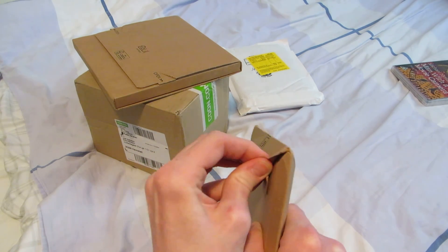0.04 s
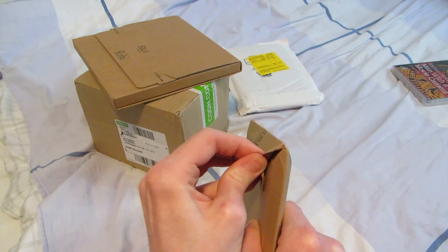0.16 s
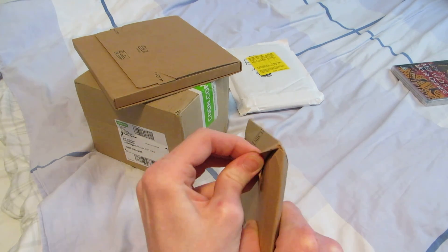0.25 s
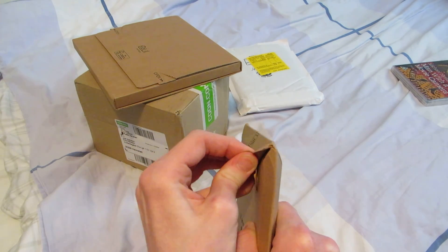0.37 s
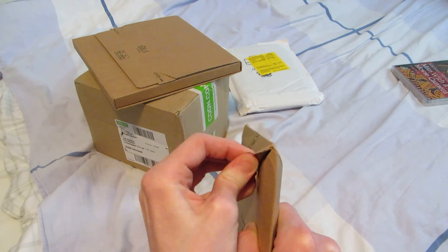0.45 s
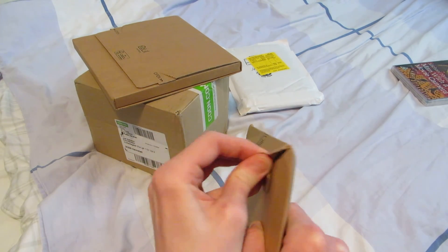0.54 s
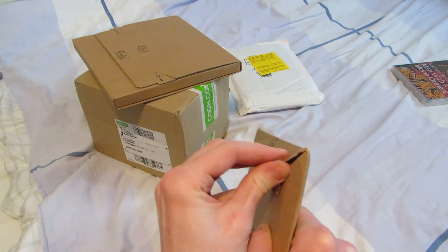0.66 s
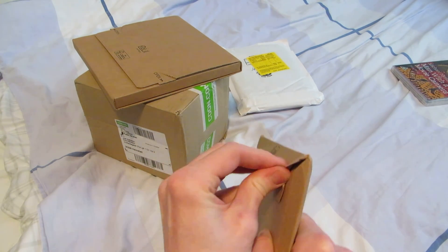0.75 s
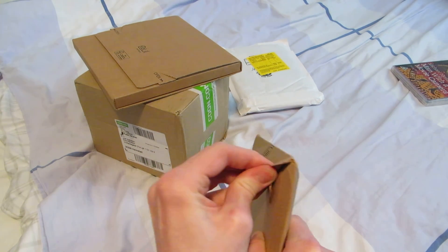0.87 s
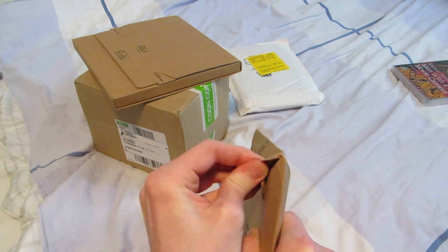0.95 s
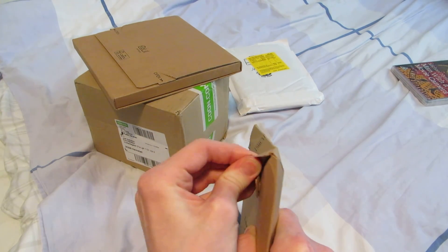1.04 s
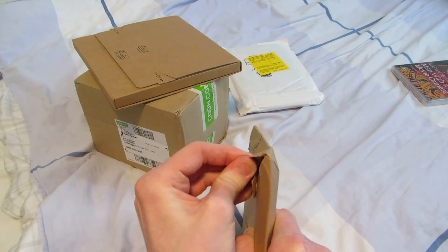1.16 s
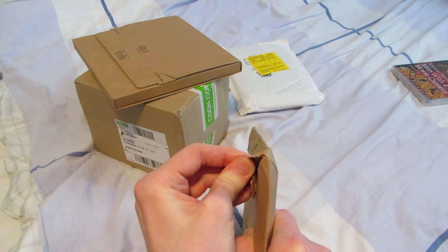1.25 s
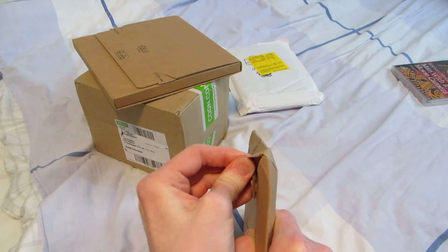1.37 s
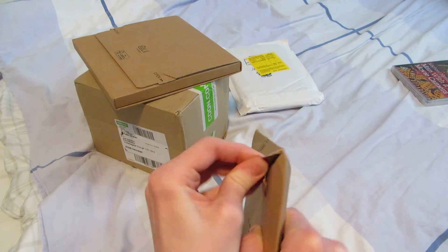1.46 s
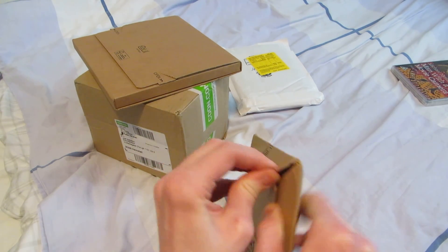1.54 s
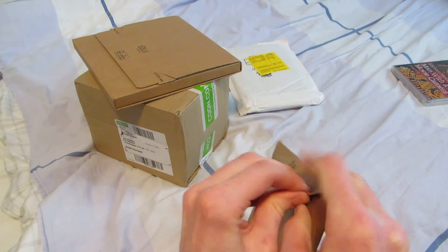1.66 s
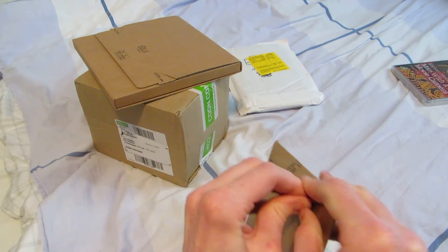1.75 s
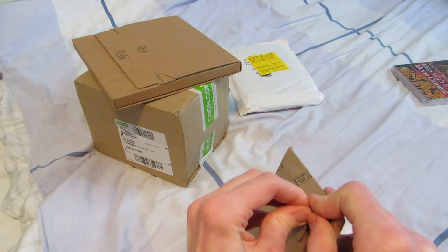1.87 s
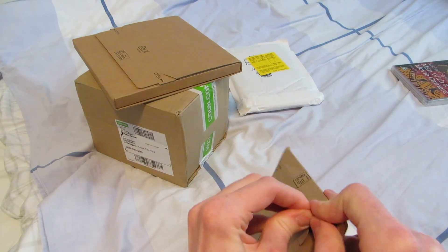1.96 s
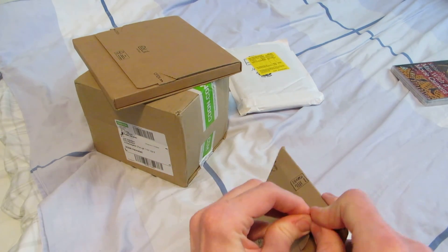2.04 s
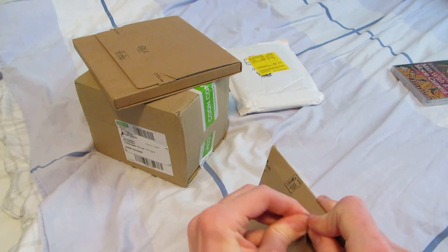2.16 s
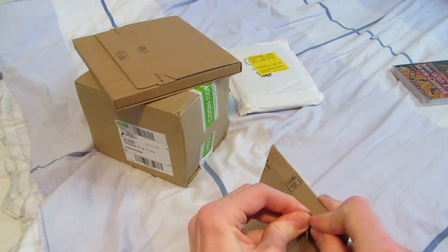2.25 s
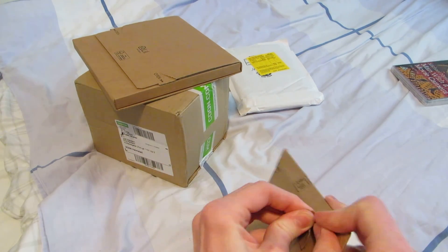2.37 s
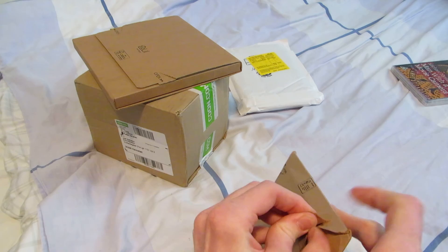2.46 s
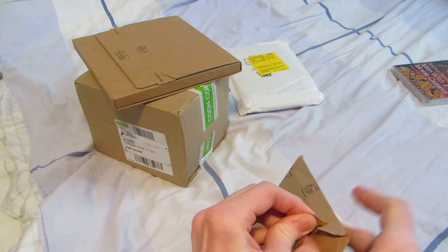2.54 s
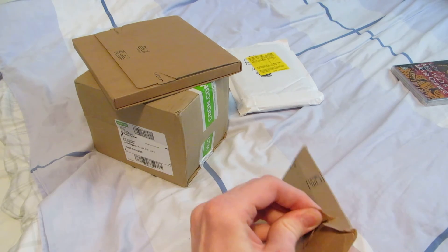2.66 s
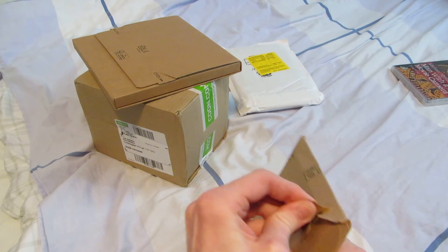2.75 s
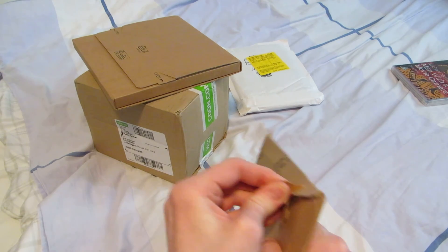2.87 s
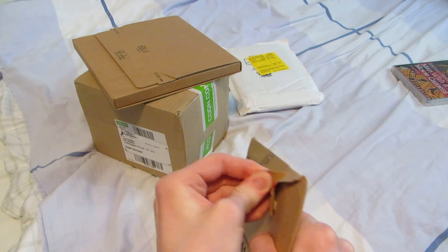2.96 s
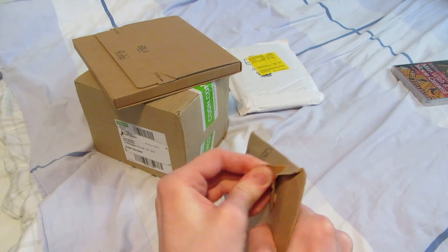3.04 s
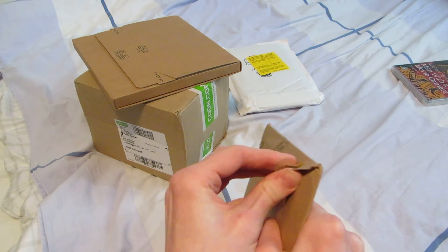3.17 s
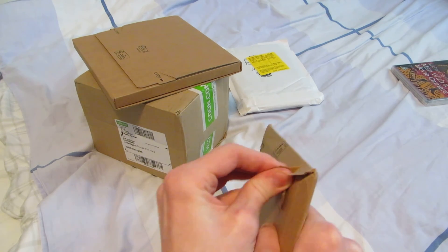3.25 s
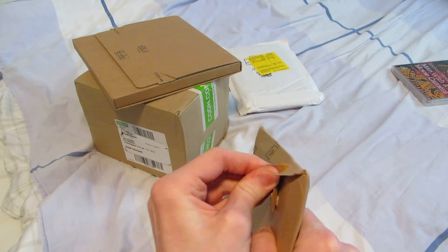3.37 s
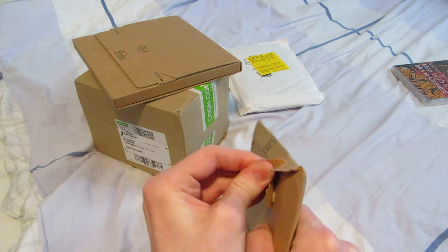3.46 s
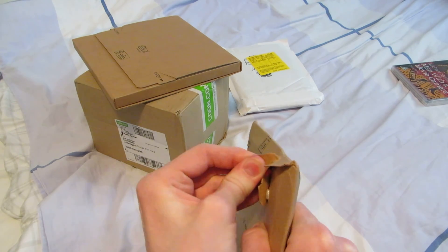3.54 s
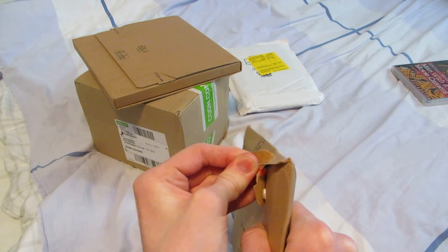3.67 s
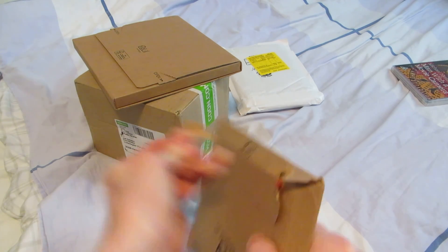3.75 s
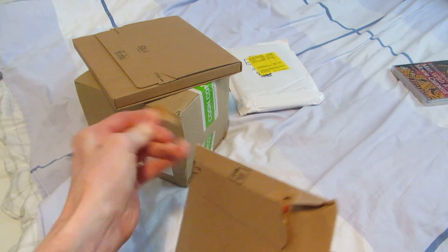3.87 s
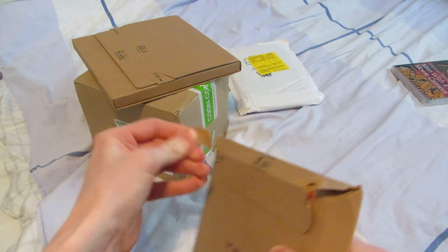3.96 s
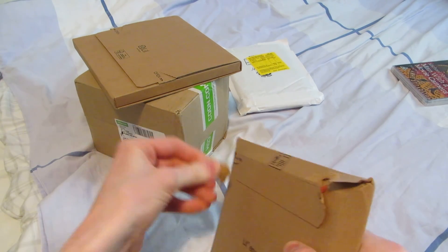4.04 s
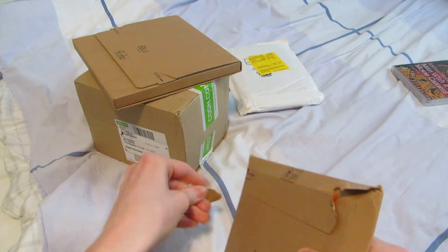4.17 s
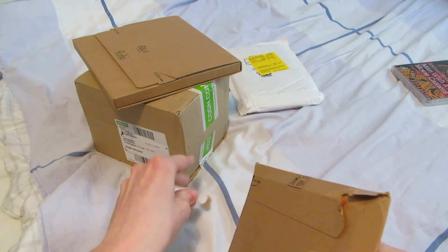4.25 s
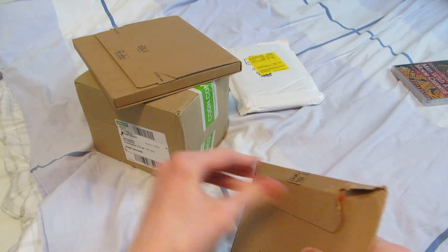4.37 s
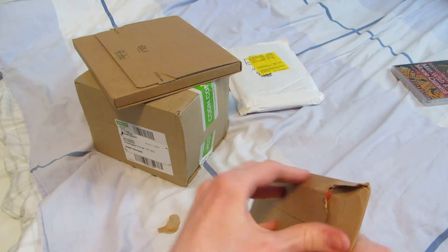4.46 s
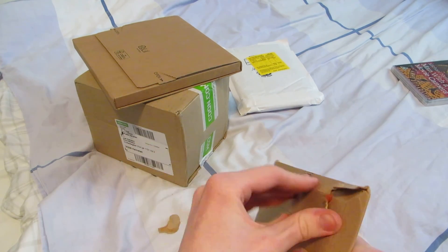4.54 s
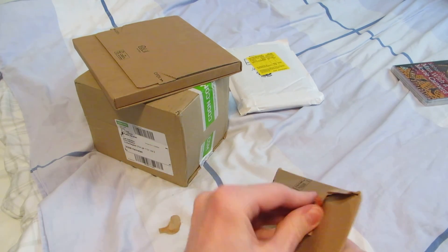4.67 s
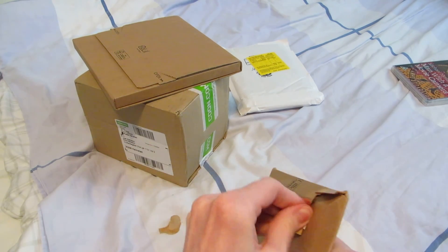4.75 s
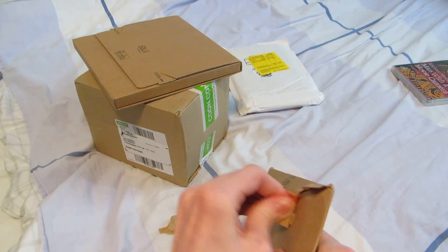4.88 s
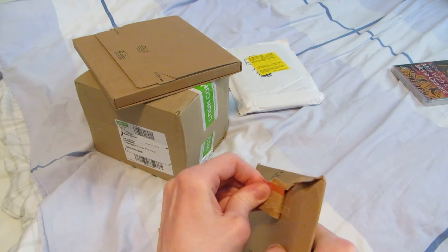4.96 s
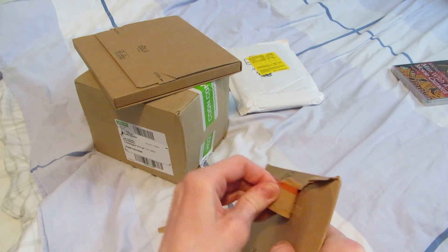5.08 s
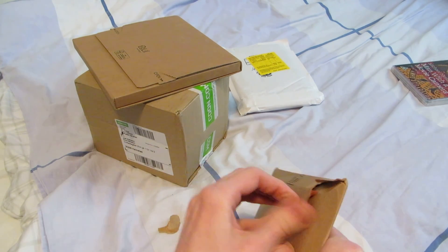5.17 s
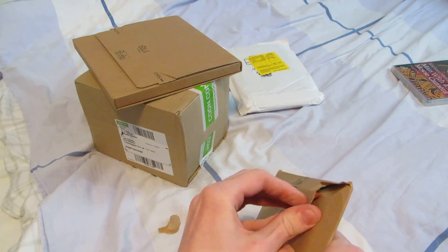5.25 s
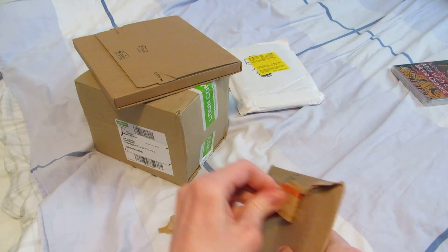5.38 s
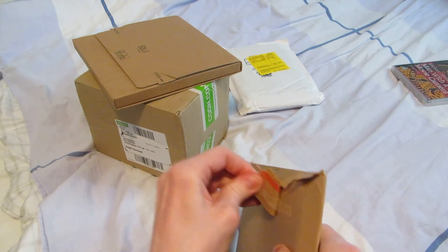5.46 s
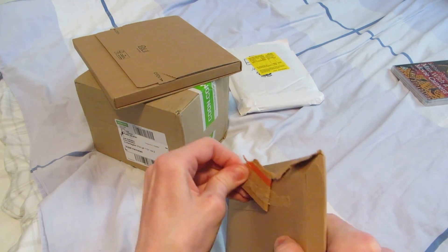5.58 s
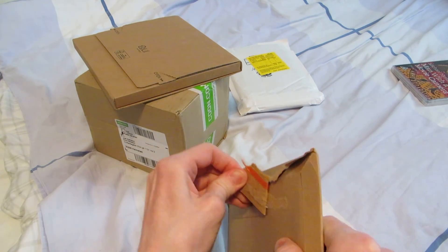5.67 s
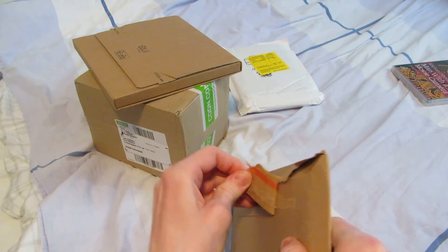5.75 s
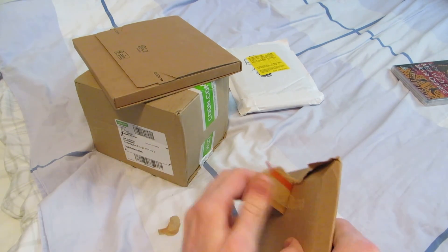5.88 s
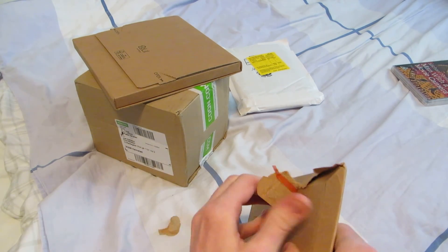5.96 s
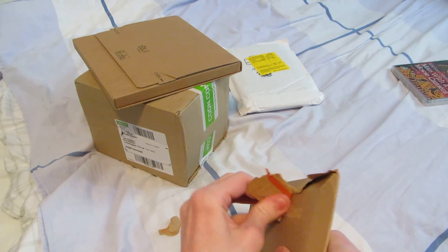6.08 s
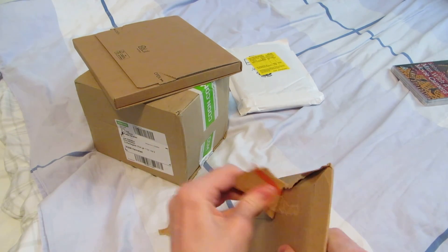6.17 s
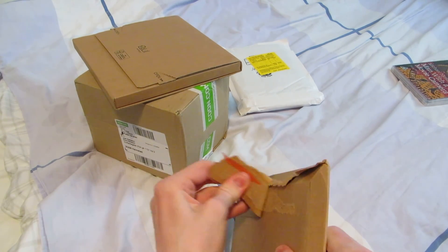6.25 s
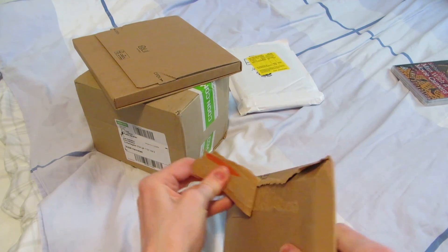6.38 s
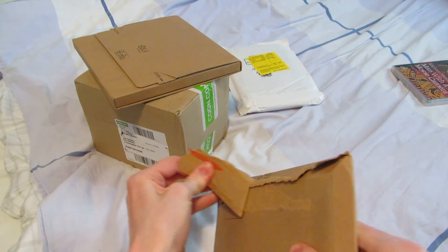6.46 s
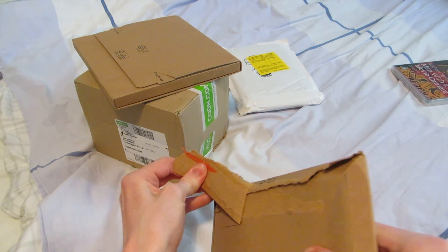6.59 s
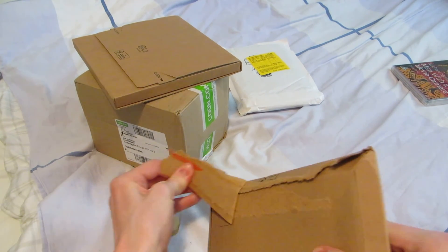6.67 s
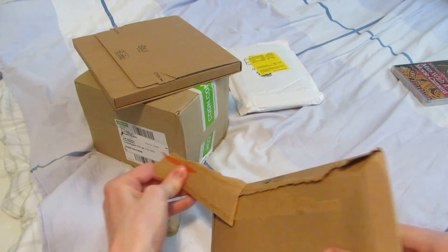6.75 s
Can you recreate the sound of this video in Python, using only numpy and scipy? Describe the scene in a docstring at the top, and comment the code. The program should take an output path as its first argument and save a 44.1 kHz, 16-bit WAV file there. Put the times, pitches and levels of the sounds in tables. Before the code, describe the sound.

In a small, soft-furnished bedroom, a fingernail picks at a cardboard mailer with sparse crisp ticks. Fingers slide and rustle, the nail rasps along a fold, and a corner tears off with a short, loud jerk. After softer handling come sharp card snaps and brief rips, then longer, grainy tearing runs to the end. Close stereo camera microphone, slight hiss, very little reverberation.

```python
"""A nail picks at the flap of a cardboard mailer, close by in a small bedroom, over soft camera hiss.
Fingers slide over the card, the nail drags along the fold and a corner tears off with a jerk.
Then the card buckles with a few sharp snaps, and the tear strip is pulled in long, grainy rips.
Strokes are many tiny random clicks coloured by the hollow card; ticks and snaps are single cracks
with a short ring of the panel. Room reflections and gain control are added on top."""
import sys
import numpy as np
from scipy import signal
from scipy.fft import rfft, irfft
from scipy.io import wavfile
from scipy.ndimage import uniform_filter1d

SR = 44100
rng = np.random.default_rng(int(sys.argv[2]) if len(sys.argv) > 2 else 0)


def unload_wav(signal):
    """Save mono or channel-first audio to the path in sys.argv[1] as 16-bit WAV at rate SR, clipped to [-1, 1]."""
    wavfile.write(
        sys.argv[1],
        SR,
        np.round(np.clip(np.atleast_2d(signal).T, -1, 1) * 32767).astype(np.int16),
    )


N = 300665
HZ = np.fft.rfftfreq(4096, 1 / SR)  # frequency grid for the filters


def amp(db):
    """Turns decibels into a gain."""
    return 10 ** (np.asarray(db) / 20)


def evened(x):
    """Scales a signal to an average strength (rms) of 1."""
    return x / np.sqrt(np.mean(x ** 2) + 1e-20)


def read(points, hz):
    """Reads values between the rows of a table, along a logarithmic pitch scale."""
    f, value = np.transpose(points)
    return np.interp(np.log(hz + 1), np.log(f + 1), value)


def add(mix, s, sound):
    """Mixes a sound in at time s, in seconds."""
    start = max(round(s * SR), 0)
    part = mix[..., start:][..., :sound.shape[-1]]
    part += sound[..., :part.shape[-1]]


def ring(db):
    """The click response of a filter with gain db on the grid HZ; it starts at once (minimum phase)."""
    log_gain = np.log(amp(np.maximum(db - db.max(), -100)))
    circle = np.concatenate([log_gain, log_gain[-2:0:-1]])
    response = np.exp(np.conj(signal.hilbert(circle)))
    return irfft(response[:len(HZ)])


def coloured(x, db):
    """Filters a signal to the tone colour db."""
    return signal.fftconvolve(x, ring(db))[:len(x)]


def hump(hz, centre_hz, steep_db):
    """A broad hump in dB that has fallen by steep_db one octave from its centre."""
    octaves = np.log2((hz + 1) / centre_hz)
    return -steep_db * (np.sqrt(1 + 3 * octaves ** 2) - 1)


def resonate(x, hz, width):
    """A resonance of gain 1 whose pitch follows the curve hz."""
    turn = np.exp(2j * np.pi * np.cumsum(hz) / SR)
    r = np.exp(-np.pi * width / SR)
    # shift the moving pitch down to zero, smooth there, and shift back up
    return 2 * (turn * signal.lfilter([1 - r], [1, -r], x / turn)).real


# How wide the sound is at the two microphones: (f/Hz, side-minus-middle level/dB)
STEREO_WIDTH = [(150, -11.5), (500, -11.5), (1500, -15.5), (3000, -15.5), (6000, -11), (10000, -6),
                (15000, -4)]


def spread(mid, side):
    """Left and right: nearly alike in the middle of the range, wider in the treble."""
    size = len(side)
    width = amp(read(STEREO_WIDTH, np.fft.rfftfreq(size, 1 / SR)))
    side = irfft(rfft(side) * width, size)
    return np.array([mid + side, mid - side])


# How far a stroke's level moves in one rise or fall time [dB]
SWELL_DB = 21.5


def pressure(strokes, sag_octaves_per_s):
    """Strokes swell, hold and die away, adding in power; the ring of the card patch sags meanwhile."""
    t = np.arange(0, N, 32) / SR
    s, rise, hold, fall, db, flex, fizz, hz, lift = np.transpose(strokes)[..., None]
    away = np.maximum(s - t, 0) / rise + np.maximum(t - s - hold, 0) / fall
    power = amp(db - SWELL_DB * away) ** 2 + 1e-20
    # one gain each for flexing panel, main band and fizz
    gains = [np.sqrt((power * amp(band) ** 2).sum(0)) for band in (flex, 0, fizz)]
    sagged = hz * 2 ** (-sag_octaves_per_s * np.clip(t - s, -rise, hold + fall))
    # the stronger stroke has more say in the patch's pitch and lift
    patch = [(curve * power).sum(0) / power.sum(0) for curve in (sagged, lift)]
    return [np.interp(np.arange(N) / SR, t, curve) for curve in (*gains, *patch)]


# Resonances of the hollow mailer: (f/Hz, width f/Hz, lift level/dB, scaled by each kind of stroke)
HOLLOW_RESONANCES = [(259, 51, 1.5), (880, 57, -2.5), (998, 48, 4), (1494, 120, 8), (2272, 69, 6.5),
                     (2520, 53, -1), (2974, 116, 6.5), (3560, 150, 5.5), (4420, 360, 3), (7500, 460, 1.5)]


def friction(strokes, colour, split_hz, per_s, spread_db, clump_db, clump_s, hollow, bed_db,
             patch_width_hz=800, wander_octaves=0.069, sag_octaves_per_s=.4):
    """Fibres catch and break in clumps; each break is a click that sounds through the mailer."""
    chance, size = rng.random(N), rng.exponential(1, N)
    sign, bearing, clumps, fine = rng.standard_normal((4, N))
    fade = np.exp(-np.arange(SR // 10) / (clump_s * SR))
    clumps = evened(signal.fftconvolve(clumps, fade)[:N])

    clicks = (chance < per_s / SR) * np.sign(sign) * amp(spread_db * np.minimum(size, 4))
    # a bed of fine noise fills the gaps between clicks
    breaks = evened(clicks) + amp(bed_db) * fine
    breaks = breaks * amp(clump_db * np.clip(clumps, -2, 2))
    # each break lies in a slightly different direction
    breaks = np.array([breaks, breaks * bearing])

    *gains, patch_hz, patch_db = pressure(strokes, sag_octaves_per_s)
    # the patch changes size a little from one clump to the next
    wander = uniform_filter1d(rng.standard_normal(N), size=700)
    wander = evened(uniform_filter1d(wander, size=400))
    patch_hz = patch_hz * 2 ** (wander_octaves * np.clip(wander, -2, 2))
    breaks = breaks + (amp(patch_db) - 1) * resonate(breaks, patch_hz, patch_width_hz)

    lift_db = sum(db / (1 + (2 * (HZ - hz) / width) ** 2) for hz, width, db in HOLLOW_RESONANCES)
    tone_db = read(colour, HZ) + hollow * lift_db
    pair = spread(*(coloured(part, tone_db) for part in breaks))

    # split into flexing panel, main band and fizz, even each one out, then apply its gain
    filters = [signal.butter(4, hz, fs=SR, output="sos") for hz in split_hz]
    low, upto = (signal.sosfiltfilt(sos, pair, padtype="even") for sos in filters)
    bands = (low, upto - low, pair - upto)
    return sum(gain * part / part.mean(0).std() for gain, part in zip(gains, bands))


def crack(centre_hz, steep_db):
    """One dry click of peak 1, with its energy heaped around centre_hz."""
    click = ring(hump(HZ, centre_hz, steep_db))
    return click / abs(click).max()


def splinter(click, after_db, after_s):
    """Neighbouring fibres give way just after the first, a little differently for each microphone."""
    t = np.arange(SR // 100) / SR
    shared, left, right = rng.standard_normal((3, len(t))) * np.exp(-t / after_s)
    train = shared + .5 * np.array([left, right])
    train *= amp(after_db) / np.linalg.norm(train[0])
    train[:, 0] = 1  # the first break itself
    return signal.fftconvolve(click[None], train, axes=1)


# Ways the panel rings: (f/Hz, level/dB before scaling to peak 1, time to fall 60 dB t/s)
PANEL_MODES = [(185, -13, 0.044), (264, 1.5, 0.038), (361, 2.5, 0.023), (443, -1.5, 0.019),
               (740, -7.5, 0.011), (892, -5, 0.027), (1030, 1.5, 0.013), (1152, 0.5, 0.013),
               (1472, 1.5, 0.026), (2300, -12, 0.0157)]


def knock(centre_hz, steep_db=11, cut_share=.58):
    """The panel rings briefly; the larger the patch that moves, the lower the modes it drives."""
    t = np.arange(SR // 8) / SR
    modes = np.zeros(len(t))
    for hz, db, t60 in PANEL_MODES:
        decay = np.exp(-np.log(1000) * t / t60)
        modes += amp(db + hump(hz, centre_hz, steep_db)) * decay * np.sin(2 * np.pi * hz * t)
    # a patch radiates almost nothing far below its own pitch
    high_pass = signal.butter(3, cut_share * centre_hz, "high", fs=SR, output="sos")
    modes = signal.sosfilt(high_pass, modes)
    return modes / abs(modes).max()


# Faint throb and hum, opposite in the two channels: (f/Hz, left rms level/dB, right rms level/dB)
THROB_AND_HUM = [(18.3, -55.5, -90), (123, -66, -72.5)]
# Colour of the hiss both channels share: (f/Hz, relative level/dB)
HISS_SHARED = [(35, -38), (60, -3), (193, -10.5), (732, -5), (1250, -1), (1440, -5.5), (1620, -5),
               (3120, -10), (3420, -10), (7060, -17), (7750, -16), (8320, -17), (16000, -25)]
# Colour of the hiss that is opposite in the two channels: (f/Hz, relative level/dB)
HISS_OPPOSITE = [(35, -32), (60, 4), (160, -10), (256, -3), (636, -5), (715, 3), (767, -7), (968, -1.5),
                 (1280, -6), (1410, -4.5), (3580, -12), (4030, -13.5), (5460, -16), (11800, -26),
                 (16000, -36)]
# Reference level of the hiss, before the shared and opposite trims [dB]
HISS_LEVEL_DB = -51.5


def camera_noise(shared_db=-2.5, apart_db=5):
    """Steady hiss is filtered noise, mostly opposite left and right; throb and hum are plain sines."""
    mid = amp(shared_db) * evened(coloured(rng.standard_normal(N), read(HISS_SHARED, HZ)))
    side = amp(apart_db) * evened(coloured(rng.standard_normal(N), read(HISS_OPPOSITE, HZ)))
    noise = amp(HISS_LEVEL_DB) * np.array([mid + side, mid - side])
    for hz, left, right in THROB_AND_HUM:
        tone = np.sqrt(2) * np.sin(2 * np.pi * hz * np.arange(N) / SR)
        noise += np.outer([amp(left), -amp(right)], tone)
    return noise


# A nail picks at the edge of the flap. All stroke tables have these columns:
# (full pressure from t/s, rise t/s, hold t/s, fall t/s, level/dB before the function's trim,
#  panel flexing level/dB re stroke, fibre fizz level/dB re stroke,
#  ring of the card patch at the contact f/Hz, lift of that ring level/dB)
PICK_STROKES = [(0.035, 0.15, 0.0072, 0.055, -40, -15, -1, 6000, 2),
                (0.063, 0.012, 0.0081, 0.15, -39.5, -11, -1, 6000, .5),
                (0.19, 0.0089, 0.028, 0.084, -37.5, -6, -1, 4800, -7),
                (0.28, 0.045, .15, 0.062, -47, -7.5, -2, 3800, 3.5),
                (0.885, 0.062, 0.079, 0.53, -47.5, -8, -4.5, 3970, -3.5)]
# Tone colour of picking: (f/Hz, relative level/dB)
PICK_TONE = [(88, -62), (150, -24), (376, -22), (545, -37), (589, -27), (821, -4), (888, -20), (960, -3),
             (1660, -9.5), (3490, 0), (5250, -5.5), (8400, -1), (16000, -16)]
FINGER_SPLIT_HZ = (2200, 7000)  # where flexing, main band and fizz part


def picking():
    """The nail catches few fibres at a time, so the clicks come as sparse crackle."""
    return amp(-3.0) * friction(
        PICK_STROKES, PICK_TONE, FINGER_SPLIT_HZ, per_s=600, spread_db=2.0,
        clump_db=5.0, clump_s=0.0029, hollow=0.37, bed_db=-4.5)


# The clearer ticks of nail and fibre:
# (t/s, first crack level/dB, centre f/Hz, knock on the panel level/dB re crack)
TICK_EVENTS = [(0.0269, -23, 5970, -23), (0.0367, -25, 6500, -22), (0.037, -15, 6460, -29),
               (0.064, -17.5, 5960, -20.5), (.1165, -22.5, 6000, -24), (.123, -22.5, 6000, -30),
               (0.1886, -12.5, 4850, -29), (0.199, -19, 5500, -32), (0.2066, -10.5, 5700, -22),
               (.2278, -21, 5500, -31), (0.2414, -25, 5500, -29), (0.2831, -19, 5600, -28),
               (0.3527, -21.5, 5900, -23), (.426, -25, 6550, -29), (.6595, -27, 1800, -3),
               (0.9554, -22, 5470, -27.5), (0.986, -27, 6960, -28), (1.353, -35.5, 2180, -0.5),
               (1.549, -18, 6740, -16), (2.891, -18, 5940, -26), (3.1847, -20.5, 2200, -1.5),
               (3.306, -26, 3470, -21), (3.3757, -23, 6000, -33), (3.3915, -22.5, 6000, -24),
               (3.5732, -9.5, 4170, -24), (3.6752, -10.5, 4500, -20), (3.721, -12.5, 4500, -30),
               (4.487, -19.5, 3020, -8.5), (4.6384, -13.5, 5630, -28), (4.7326, -14, 4260, -15.5),
               (4.7537, -25.5, 2560, -2.5), (4.8817, -21.5, 2170, -5.5), (5.1834, -19, 4500, -22.5),
               (5.4278, -20.5, 4430, -11), (5.749, -20.5, 5270, -18), (6.0546, -20.5, 3000, -7.5),
               (6.179, -13, 4860, -25), (6.2095, -5, 4470, -34), (6.2405, -4, 3500, -8),
               (6.311, -12, 5000, -11), (6.3713, -7.5, 3600, -13), (6.4874, -3, 4000, -16),
               (6.677, -7, 3500, -26)]


def ticks():
    """Each tick is a small crack with splinters and a knock on the panel."""
    out = np.zeros((2, N))
    for s, db, hz, knock_db in TICK_EVENTS:
        add(out, s, amp(db) * splinter(crack(hz, steep_db=10.5), after_db=-5.5, after_s=0.0014))
        add(out, s, amp(db + knock_db) * knock(880, steep_db=2))
    return out


# How fast the bedroom's tail dies: (f/Hz, time to fall 60 dB t/s)
ROOM_DECAY = [(150, 0.08), (500, 0.1053), (1500, 0.1164), (4000, 0.2355), (8000, 0.21), (16000, 0.1)]
# First reflections: (delay t/s, level/dB)
FIRST_ECHOES = [(.005, -16.5), (.0091, -27), (0.0157, -35), (0.018, -22.5)]


def bedroom(x, wet_db=-12):
    """A few near reflections, and a short noise-like tail that the bedding soaks up."""
    noise = spread(*rng.standard_normal((2, SR // 2)))
    hz, t, z = signal.stft(noise, SR, nperseg=256)
    decay = np.exp(-np.log(1000) * t / read(ROOM_DECAY, hz)[:, None])
    z = z * decay * np.minimum(t / 0.009, 1)  # the tail builds up over 9 ms
    tail = signal.istft(z, SR, nperseg=256)[1]
    tail *= amp(wet_db) / np.linalg.norm(tail[0])
    for s, db in FIRST_ECHOES:
        add(tail, s, amp([db]))
    return signal.fftconvolve(x.mean(0)[None], tail, axes=1)[:, :N]


# Skin and loose card slide over the mailer: stroke columns as in PICK_STROKES
# (t/s, rise t/s, hold t/s, fall t/s, level/dB, flex level/dB, fizz level/dB, ring f/Hz, lift level/dB)
RUB_STROKES = [(0.605, 0.057, 0.026, 0.047, -47, -5, -4.5, 1980, 4.8),
               (0.772, 0.03, 0.007, 0.056, -38, -1, -2.5, 4020, 0.59),
               (1.22, 0.23, 0.12, .2, -64.5, 9, -17, 1500, 0.92),
               (1.555, 0.071, 0.048, 0.16, -39, -2.5, -2, 3000, 1.5),
               (1.66, 0.036, 0.0057, 0.093, -41.5, -7, -16, 3000, 1),
               (1.78, 0.085, .01, 0.22, -41, -2.5, -9, 3000, 1),
               (1.895, 0.11, 0.01, 0.073, -42.5, -4, -2.5, 4500, 1.1),
               (2.2, 0.11, 0.018, 0.068, -45.5, 0.5, 0.5, 6470, 1.5),
               (2.238, 0.043, 0.0091, 0.059, -27, -13, -2.5, 6500, 7),
               (2.335, 0.035, 0.05, 0.042, -40, -10.5, -0.5, 6700, 6.5),
               (2.468, 0.046, 0.022, 0.14, -36, -4.5, -6.5, 4100, 3),
               (2.636, 0.081, 0.0054, 0.054, -28.5, -11.5, -2, 4700, 7.5),
               (2.67, 0.18, 0.01, 0.25, -38, -1, -4, 4800, 3),
               (2.905, 0.13, .125, .045, -34.5, -6.5, -4, 3000, 3.3),
               (3.255, 0.02, 0.01, .04, -38, -3.5, 1.5, 2500, 3.6),
               (3.81, 0.018, .005, 0.091, -39.5, 3, -11, 3500, .5),
               (4.228, 0.076, 0.025, 0.049, -56, 2, 3, 3010, 12.7),
               (4.45, 0.095, .03, .03, -51, 1, -8, 3000, 1),
               (4.495, .018, 0.079, 0.16, -37.5, -1.5, -4, 2960, 3.5),
               (4.64, 0.016, 0.049, 0.15, -40.5, -6.5, -3, 3000, 1.3),
               (4.785, 0.063, 0.011, 0.075, -37, -3, -4.5, 3100, 1.6),
               (4.93, 0.16, .005, 0.035, -39, -1.5, -4.5, 3200, 1),
               (5.05, .02, 0.0044, 0.21, -44.5, 1, -11, 3200, 1),
               (5.178, .04, 0.0073, 0.035, -45, -3, -4, 4400, 4),
               (5.235, 0.016, 0.0072, 0.043, -43.5, 6, -6, 3100, 1),
               (5.36, 0.12, .005, 0.12, -39.5, -5.5, -4.5, 3140, 1.7),
               (5.874, 0.1, 0.0034, 0.091, -41, -0.5, -6, 3600, 5),
               (5.943, 0.013, 0.0068, 0.044, -42, 13, -13, 2000, 2.1),
               (6.089, 0.031, 0.0091, 0.012, -30.5, -5.5, -5.5, 4150, 11.3),
               (6.11, 0.29, 0.029, .1, -47.5, 2.5, 3, 4400, 2.4)]
# Tone colour of sliding: (f/Hz, relative level/dB)
RUB_TONE = [(71, -49), (120, -20), (144, -19), (188, -16), (418, -11.5), (557, -27), (656, -5), (1320, -5),
            (1490, -3.5), (2480, -2.5), (2990, -1), (5300, -0.5), (9400, -6.5), (15000, -16),
            (16000, -18.5)]


def sliding():
    """Skin catches so many fibres a second that the clicks blur into a fine hiss."""
    return amp(-2.5) * friction(
        RUB_STROKES, RUB_TONE, FINGER_SPLIT_HZ, per_s=5000, spread_db=2.5,
        clump_db=1.5, clump_s=0.0041, hollow=0.52, bed_db=-4.5, patch_width_hz=790)


# A nail drags along the fold: stroke columns as in PICK_STROKES
# (t/s, rise t/s, hold t/s, fall t/s, level/dB, flex level/dB, fizz level/dB, ring f/Hz, lift level/dB)
SCRAPE_STROKES = [(0.665, 0.01, 0.01, 0.083, -40, 7.5, -2, 1770, 7),
                  (2.542, .03, 0.012, 0.063, -47, 7.5, -6, 1640, 7.2),
                  (3.132, 0.082, 0.018, .035, -49, 7, 0, 1190, 8.2),
                  (3.188, 0.018, 0.0066, 0.073, -33.5, 3.5, -5.5, 2020, 2),
                  (3.308, 0.015, .004, .05, -39.5, -3, -15, 2400, 5),
                  (3.33, 0.022, 0.01, 0.071, -38, -1, -11, 1340, 8.6)]
# Tone colour of scraping: (f/Hz, relative level/dB)
SCRAPE_TONE = [(88, -74), (150, -42), (398, -14.5), (534, -19), (601, -8.5), (837, -2.5), (1100, -3),
               (1500, -2), (2100, -6.5), (2600, -7), (4320, -13), (4950, -12), (5360, -19), (11300, -30.5),
               (16000, -39)]


def scraping():
    """The dragging nail gives a hollow rasp: a narrow ring that sags quickly in pitch."""
    return amp(-1.0) * friction(
        SCRAPE_STROKES, SCRAPE_TONE, FINGER_SPLIT_HZ, per_s=1500, spread_db=2.5,
        clump_db=1.5, clump_s=0.0025, hollow=.3, bed_db=-1.5, patch_width_hz=260, sag_octaves_per_s=7)


# The card buckles or lets go:
# (t/s, first crack level/dB, crack centre f/Hz, knock peak level/dB, knock centre f/Hz)
SNAP_EVENTS = [(3.0403, -36, 2520, -24, 620), (4.514, -34, 2480, -36, 241), (4.9485, 3.5, 4100, -0.5, 990),
               (4.95, -1.5, 3240, -23, 1030), (4.9503, -28, 2000, -23, 340),
               (5.2254, 2.5, 5600, -12.5, 1120), (5.9339, -1, 5030, -22, 374),
               (5.9362, -8.5, 2140, -16, 1560), (6.2237, -1.5, 4400, -13, 910),
               (6.2271, -2, 4150, -26, 375)]


def snaps():
    """Each snap is a crack with splinters and a knock whose pitch is its own."""
    out = np.zeros((2, N))
    for s, db, hz, knock_db, knock_hz in SNAP_EVENTS:
        add(out, s, amp(db) * splinter(crack(hz, steep_db=9), after_db=-5.0, after_s=0.0013))
        add(out, s, amp(knock_db) * knock(knock_hz))
    return out


# The card tears, tug by tug; the last tugs run together as the strip is pulled:
# (t/s, rise t/s, hold t/s, fall t/s, level/dB, flex level/dB, fizz level/dB, ring f/Hz, lift level/dB)
TEAR_STROKES = [(3.425, 0.024, 0.14, .05, -41.5, -27, 1, 4200, 6.5),
                (3.572, 0.024, 0.0073, 0.052, -30, -24, -2.5, 3750, 11),
                (3.617, 0.028, 0.014, 0.079, -30.5, -27, -3, 3740, 7.5),
                (3.665, 0.054, 0.011, 0.14, -34.5, -21, -1.5, 3720, 6),
                (4.933, 0.015, 0.022, 0.012, -36.5, -20, -4, 3200, -1),
                (4.954, .004, 0.062, 0.041, -21, -17, -8, 3200, 0.5),
                (5.458, .011, 0.084, 0.083, -23.5, -19, -7.5, 3020, 3.5),
                (5.487, 0.032, 0.0059, 0.031, -17, -25, -10.5, 3100, 7),
                (5.598, 0.06, 0.0089, 0.048, -21, -22, -5.5, 3300, 5.5),
                (5.645, .03, 0.015, 0.14, -34, -20, -7, 5530, 3),
                (6.195, 0.028, .025, .02, -31.5, -21, 2.5, 4580, 4),
                (6.226, 0.0037, 0.013, 0.069, -15.5, -12.5, -5, 4500, 0),
                (6.263, .03, 0.027, 0.11, -15, -20, -9, 4430, 3.5),
                (6.32, 0.055, 0.088, 0.091, -23.5, -21, -5, 3670, 3.5),
                (6.44, 0.14, 0.09, 0.089, -18, -16.5, -5, 2970, 5.5),
                (6.592, .02, 0.012, 0.037, -31, -34, -6, 1520, 11.5),
                (6.636, 0.034, 0.065, .05, -21, -22, -6, 3000, 5.5),
                (6.69, 0.053, 0.053, 0.054, -17.5, -17, -5.5, 3140, 7.5),
                (6.81, 0.015, .01, .02, -15, -22, -11, 3020, 1)]
# Tone colour of tearing: (f/Hz, relative level/dB)
TEAR_TONE = [(59, -65.5), (100, -38), (255, -19.5), (558, -20), (854, -5.5), (1330, -5), (1480, -0.5),
             (1760, -4.5), (2270, -2.5), (2690, -4), (3620, -2.5), (4980, -5), (7450, -9.5), (11900, -14.5),
             (16000, -24)]
TEAR_SPLIT_HZ = (700, 6000)  # where flexing, main band and fizz part


def tearing():
    """Thousands of fibres break each second and drive the hollow mailer hard."""
    return amp(1.0) * friction(
        TEAR_STROKES, TEAR_TONE, TEAR_SPLIT_HZ, per_s=4200, spread_db=2.5,
        clump_db=1.55, clump_s=0.0024, hollow=0.91, bed_db=-3.5, patch_width_hz=570,
        wander_octaves=.16, sag_octaves_per_s=1.6)


# The corner comes away: one jerk, and the last fibres trailing after it:
# (t/s, rise t/s, hold t/s, fall t/s, level/dB, flex level/dB, fizz level/dB, ring f/Hz, lift level/dB)
JERK_STROKES = [(3.761, 0.011, 0.0036, .012, -9.5, -17, -6.5, 3500, 2),
                (3.767, 0.045, .003, 0.041, -20.5, -20, -3.5, 760, 3.6)]
# Tone colour of the jerk: (f/Hz, relative level/dB)
JERK_TONE = [(71, -57), (150, -34), (370, -16), (535, -26), (720, -6), (850, 1.5), (1210, -10), (1480, -1),
             (2300, -10), (3450, -3.5), (4800, -7), (12800, -18), (16000, -20)]


def corner_jerk():
    """A dense burst of breaking fibres, far shorter than a rip."""
    return amp(1.5) * friction(
        JERK_STROKES, JERK_TONE, TEAR_SPLIT_HZ, per_s=6000, spread_db=2.5,
        clump_db=1.5, clump_s=0.0035, hollow=0.51, bed_db=-0.5)


def scene():
    """The mailer is held a little right of centre, in the bedroom, over the camera noise."""
    card = picking() + ticks() + sliding() + scraping() + snaps() + tearing() + corner_jerk()
    placed = card * amp([[-.45], [.45]])  # left, right
    return placed + bedroom(card) + camera_noise()


def record(dry, threshold_db=-19, squeeze=0.61, held_fall_db_per_s=6):
    """Gain control turns loud moments down and recovers slowly; peaks clip; the top treble is cut."""
    keep = np.exp(-1 / (0.016 * SR))  # power is averaged over about 16 ms
    power = signal.lfilter([1 - keep], [1, -keep], (dry ** 2).mean(0))
    power_db = 10 * np.log10(power + 1e-12)
    # hold the loudest level so far, letting the held level fall steadily
    fallen = np.arange(N) / SR * held_fall_db_per_s
    held_db = np.maximum.accumulate(power_db + fallen) - fallen
    over_db = np.maximum(held_db - threshold_db, 0)
    ducked = np.clip(dry * amp(-squeeze * over_db), -1, 1)
    low_pass = signal.firwin(511, 16100, window=("kaiser", 9), fs=SR)  # cut above 16.1 kHz
    return signal.oaconvolve(ducked, low_pass[None], "same", axes=1)


dry = scene()
out = record(dry)
unload_wav(out)
```